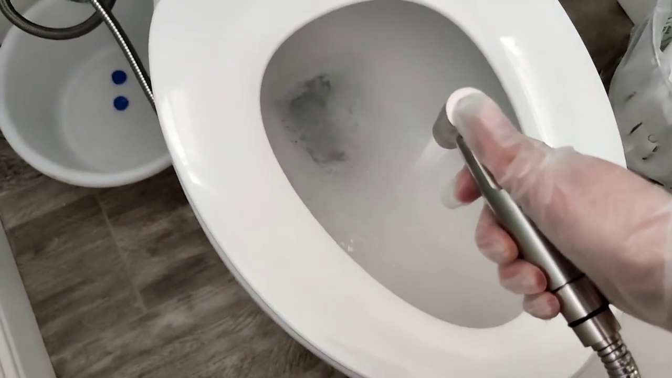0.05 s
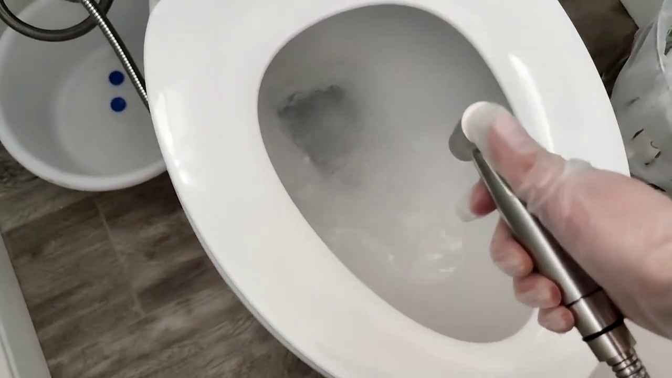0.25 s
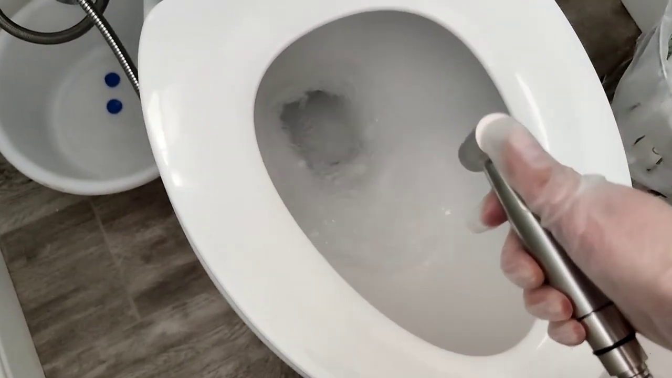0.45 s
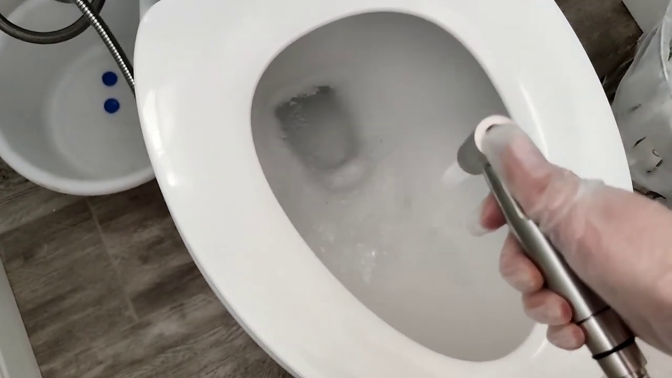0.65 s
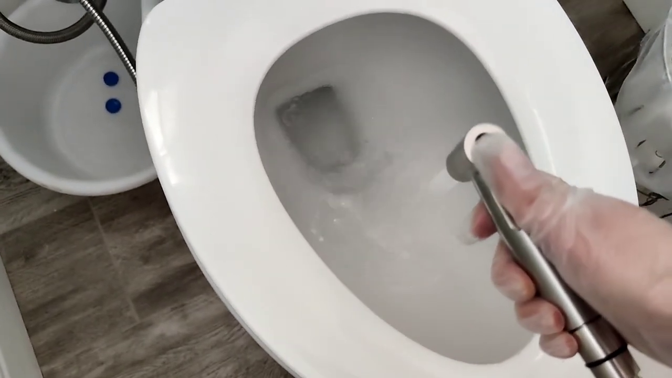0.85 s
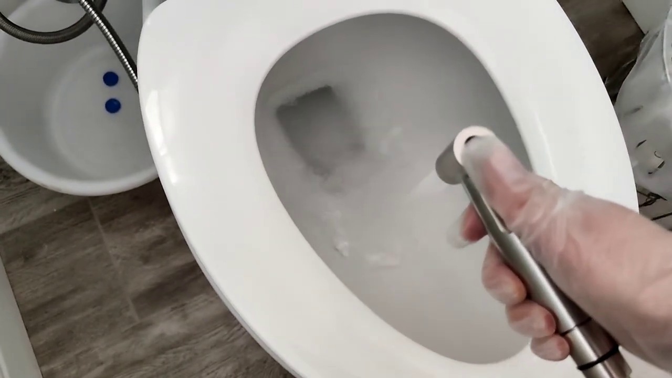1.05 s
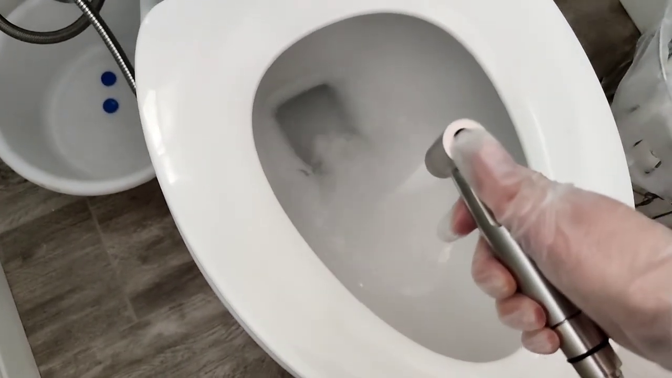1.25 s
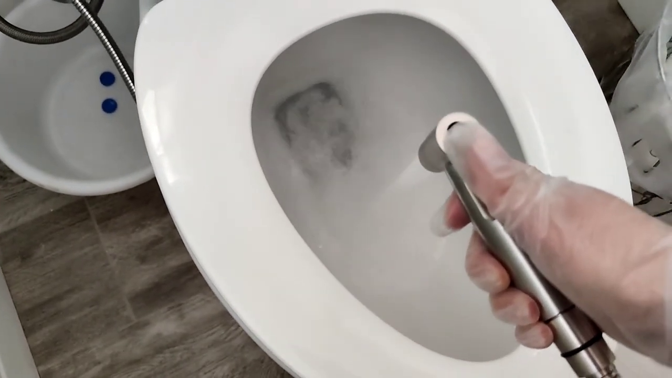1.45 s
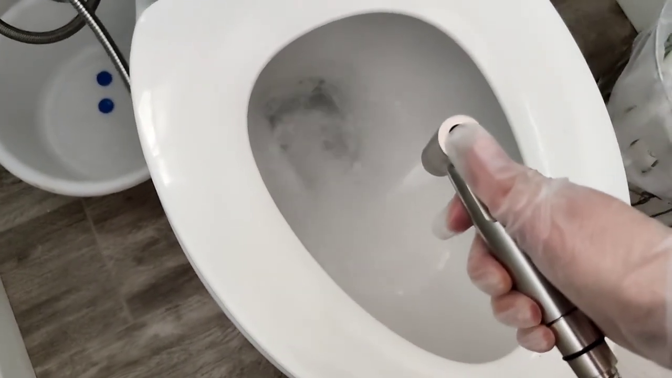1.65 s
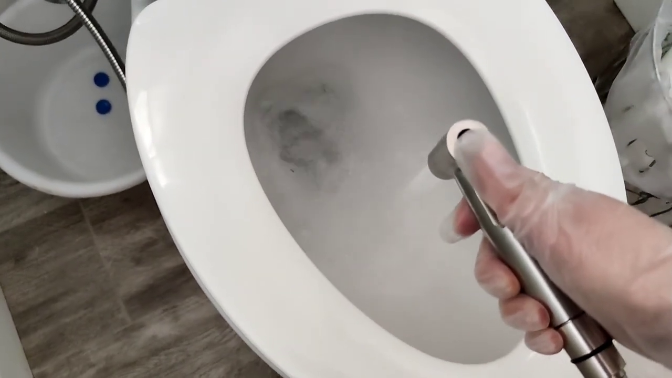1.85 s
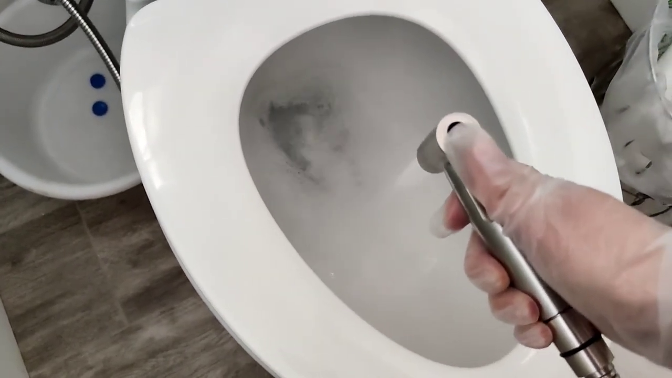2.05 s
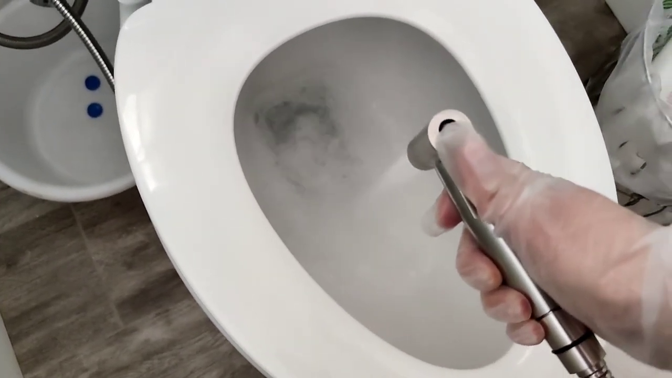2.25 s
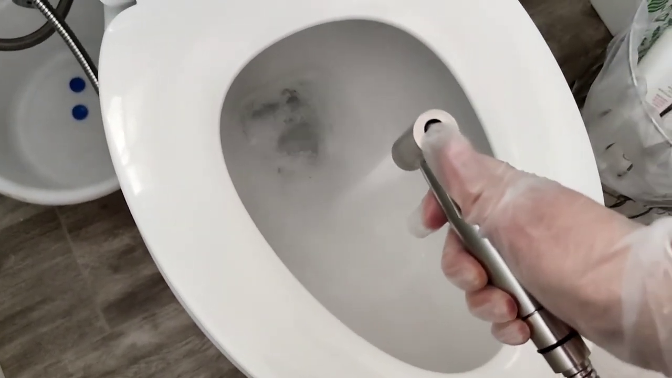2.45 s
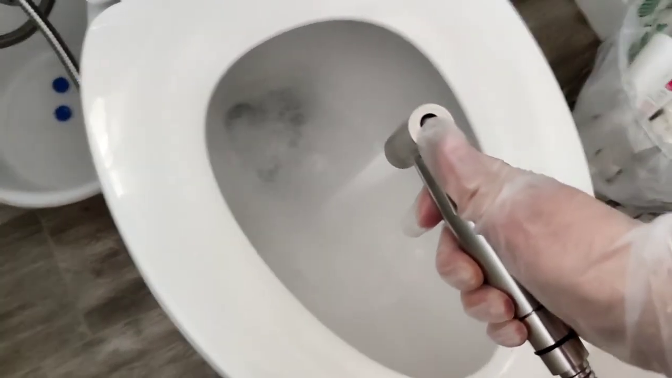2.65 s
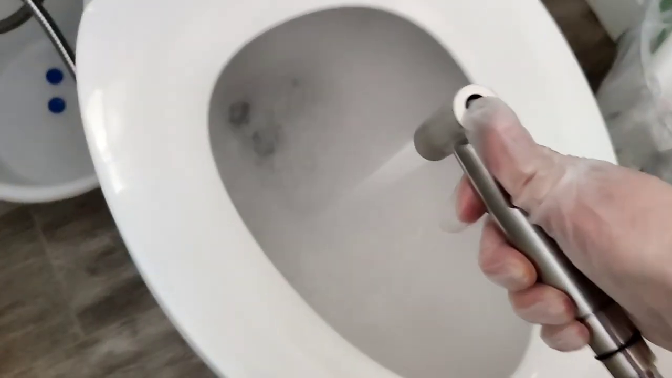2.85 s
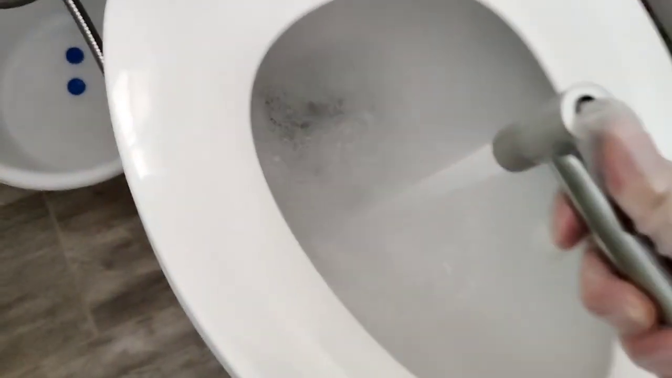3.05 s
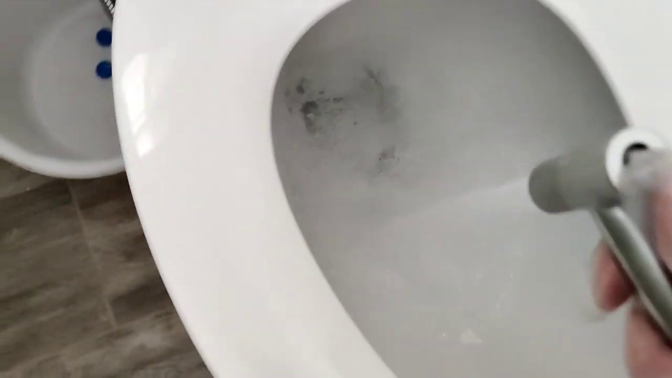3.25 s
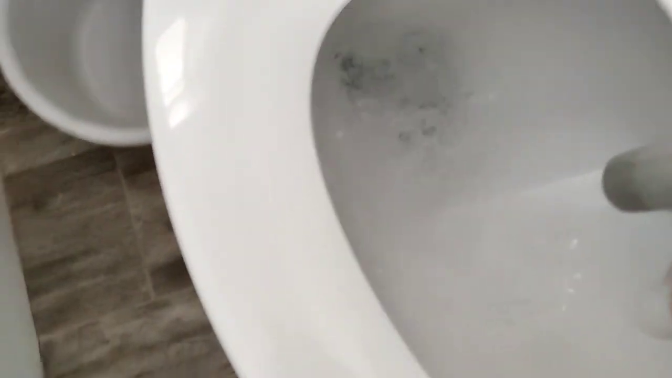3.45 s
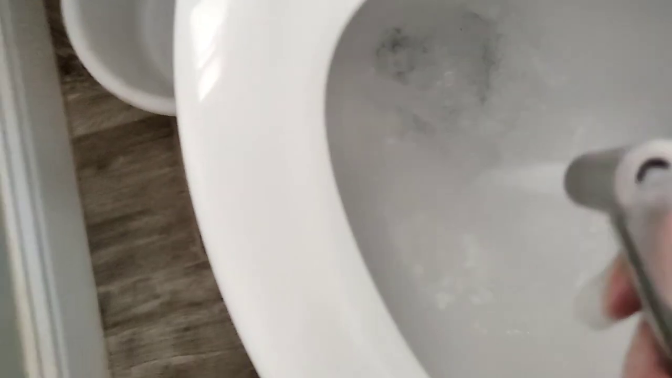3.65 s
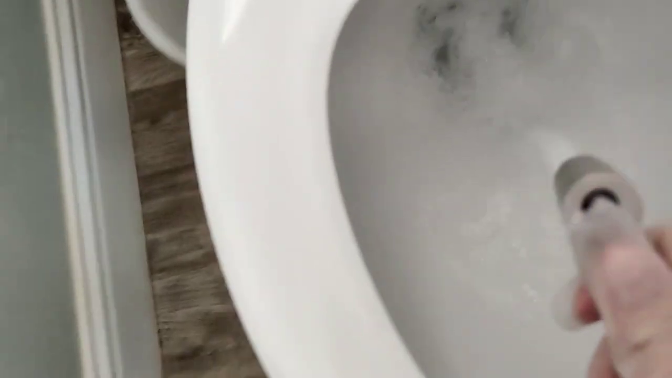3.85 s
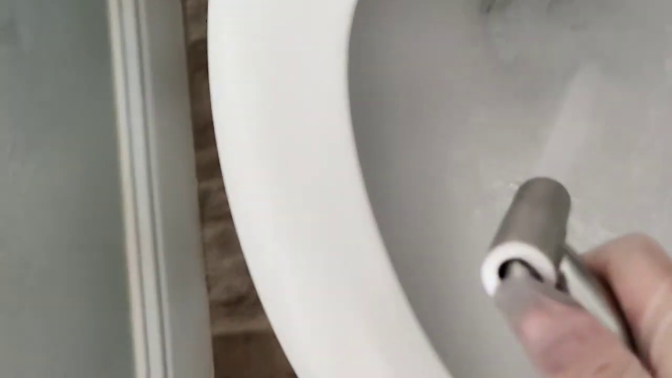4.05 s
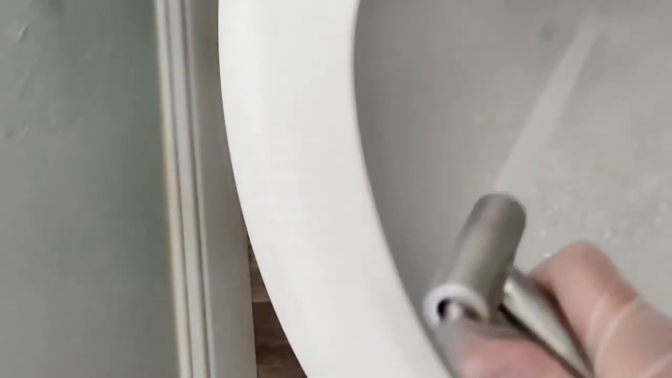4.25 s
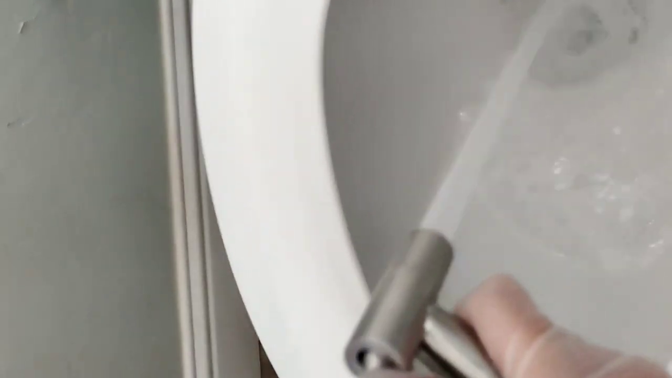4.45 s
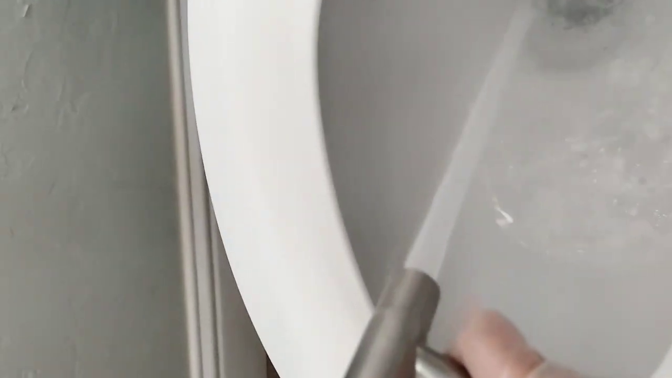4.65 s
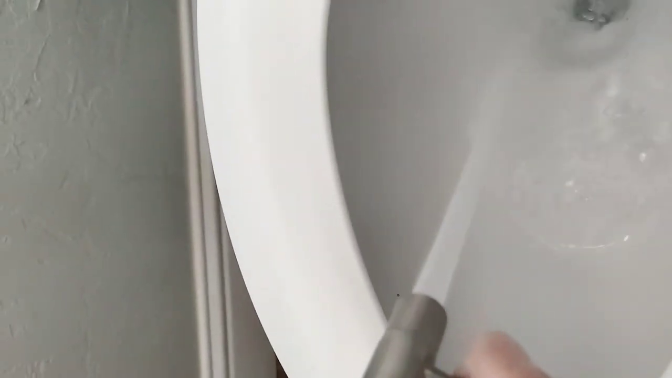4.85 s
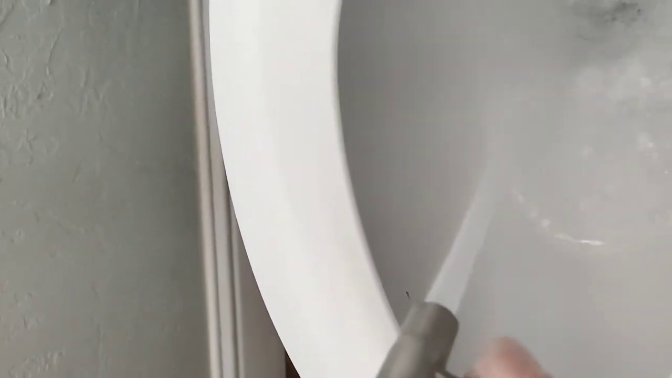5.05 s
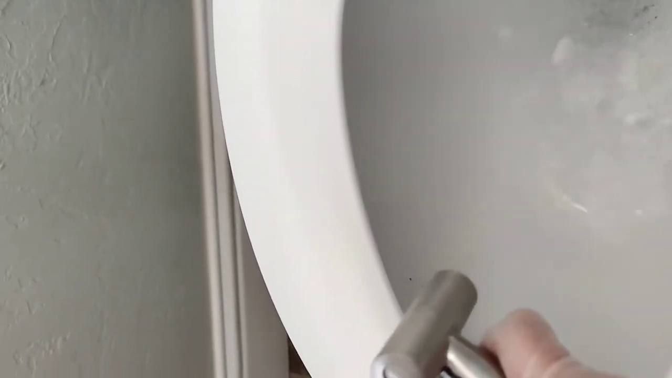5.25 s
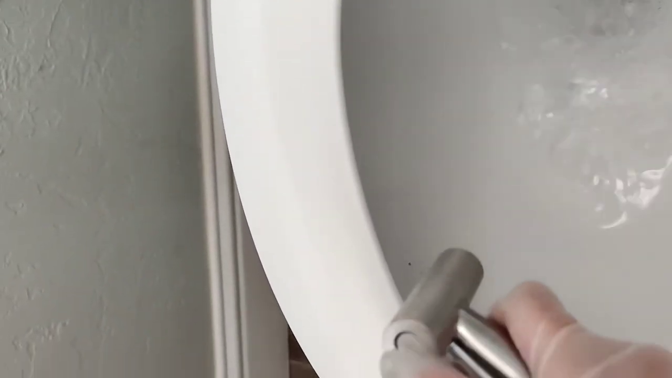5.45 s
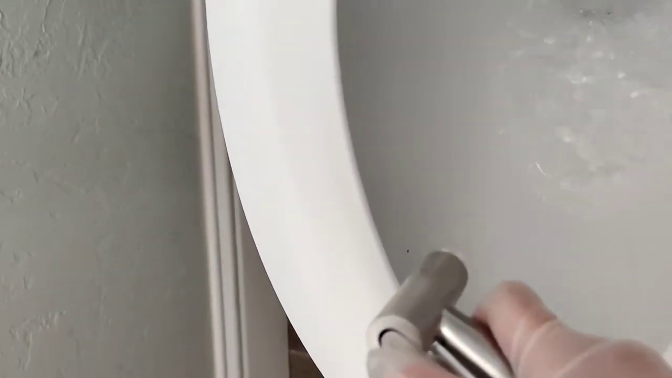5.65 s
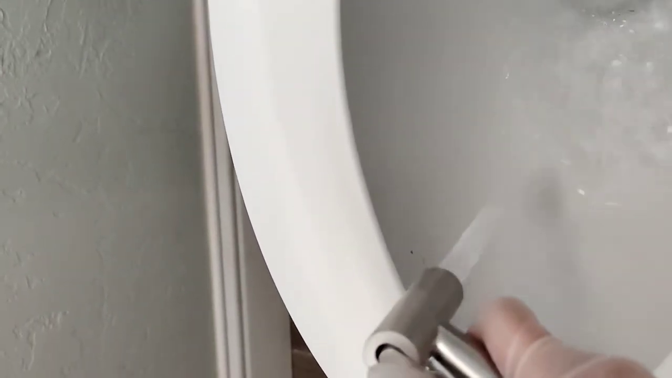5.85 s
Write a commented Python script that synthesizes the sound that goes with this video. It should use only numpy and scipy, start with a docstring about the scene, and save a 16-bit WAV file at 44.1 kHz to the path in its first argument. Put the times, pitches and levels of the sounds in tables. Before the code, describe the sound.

Close to a handheld microphone in a tiled bathroom, a pressurised water jet sprays into a toilet. A brief burst and a pause lead into a long, bright hiss with splattering drops and a low gurgle, growing more bubbly toward the end. In a second short pause there are faint drips, light hose knocks against the porcelain and slight handling rumble, before the sprayer starts once more.

```python
"""Sprayer in a toilet bowl

A handheld sprayer sends a jet of water into the bowl, stops, starts, stops and starts again.
The nozzle hisses, drops patter on porcelain, the pool gurgles and the bowl drones; in the pauses
drops tick and the hose knocks the bowl. Heard through handheld microphones in a tiled room."""
import sys
import numpy as np
from scipy import signal
from scipy.io import wavfile
from scipy.ndimage import uniform_filter1d

SR = 44100
rng = np.random.default_rng(int(sys.argv[2]) if len(sys.argv) > 2 else 0)


def to_wav(sig):
    """Store sig (one row per channel, or 1-D mono) as 16-bit WAV at the path in sys.argv[1].

    Samples outside -1..1 are clipped; the rate is SR.
    """
    pcm = np.clip(np.atleast_2d(sig), -1, 1) * 32767
    pcm = np.round(pcm).astype(np.int16)
    wavfile.write(sys.argv[1], SR, pcm.T)  # frames by channels


N = 261072
TIME = np.arange(N) / SR


def amp(db):
    return 10 ** (np.asarray(db) / 20)


def unit_rms(x):
    return x / np.sqrt(np.mean(x ** 2) + 1e-20)


def unit_centre(pair):
    return pair / np.sqrt(np.mean(pair.mean(0) ** 2))


def fader(rows, column):
    """Gain over time from one dB column."""
    rows = np.asarray(rows)
    return amp(np.interp(TIME, rows[:, 0], rows[:, column]))


def add(mix, start, sound):
    part = mix[..., round(start * SR):][..., :sound.shape[-1]]
    part += sound[..., :part.shape[-1]]


def stereo_noise(length, width):
    return rng.standard_normal(length) + width * rng.standard_normal((2, length))


def ring(x, hz, t60):
    """A two-pole resonance driven by x."""
    r, c = np.exp(-np.log(1000) / (t60 * SR)), np.cos(2 * np.pi * hz / SR)
    return (1 - r) * 2 * signal.lfilter([1, -r * c], [1, -2 * r * c, r * r], x)


def patches(spectrum, bins, frames):
    """Random swells drifting across frequency and time."""
    noise = rng.standard_normal(spectrum.shape[:0:-1]).T
    return unit_rms(uniform_filter1d(uniform_filter1d(noise, bins, axis=0), frames, axis=1))


def impacts(per_s, spread_db, fade_s, steady):
    """Loudness of landing drops: sudden rises of uneven size that fade, over a steady share."""
    sizes = amp(spread_db * np.minimum(rng.exponential(1, N), 3.2))
    hits = sizes * (rng.random(N) < per_s / SR)
    return steady + unit_rms(signal.lfilter([1], [1, -np.exp(-1 / (fade_s * SR))], hits))


def tiled_room(loudness, t60, wet_db, diffuse):
    """Noise echoing off tiles: mid is direct plus echo, side is echo plus unrelated spray."""
    direct, stray = rng.standard_normal((2, N)) * loudness
    t = TIME[:SR // 5]
    drift = np.pi * (TIME / 1.6704 + rng.random())  # the moving hand blends three echo patterns
    tails = rng.standard_normal((3, 2, len(t))) * amp(-60 * t / t60) * (t > .001)
    sends = direct * np.cos(drift + np.arange(3)[:, None] * np.pi / 3)
    mid_echo, side_echo = signal.oaconvolve(sends[:, None], tails, axes=2)[..., :N].sum(0)
    mid = unit_rms(direct) + amp(wet_db) * unit_rms(mid_echo)
    side = unit_rms(side_echo) + diffuse * unit_rms(stray)
    return np.array([unit_rms(mid), unit_rms(side)])


# Where the hands point. Each row: time in seconds, landing spot (0 near wall, 1 far across the pool),
# microphone turn (0 facing the jet, 1 aside), left over right in dB.
AIM = [(0, 0.18, .2, 0.13), (.8, 0.166, 0, -0.5), (1.2, 0, 0, .5), (2.3, 0.222, 0, 0), (2.85, 0.725, .4, 1),
       (3.2, 0.8, .4, 1), (3.42, 0.425, .4, .5), (3.8, 0.88, .5, -0.38), (4.1, 0.962, .9, -0.56),
       (4.5, 0.876, 1, -1.5), (5.3, 0.794, 1, -.5), (5.92, 0, .8, 0)]
LANDING, TURN, BALANCE = 1, 2, 3


def aimed(table, hz, t, by):
    """Crossfades a table's first and last curves as the aim moves."""
    rows, aim = np.asarray(table), np.asarray(AIM)
    blend = np.clip(np.interp(t, aim[:, 0], aim[:, by]), 0, 1)
    first, last = (np.interp(np.log(hz + 1), np.log(rows[:, 0] + 1), rows[:, k]) for k in (1, -1))
    return first[:, None] * (1 - blend) + last[:, None] * blend


# Stereo image. Each row: frequency in Hz, left-right likeness facing the jet, likeness turned aside.
LIKENESS = [(60, 0.94, 0.98), (250, 1, 1), (500, 0.503, 0.667), (1170, 0.635, 0.626), (1770, 0.124, 0.44),
            (3020, 0.36, 0.092), (4220, 0.47, -0.12), (6600, 0, 0.025), (7450, 0, -0.18),
            (7920, 0.585, 0.48), (12450, 1, 0.51), (13100, 0.42, -0.092), (16000, 0.95, 0.15)]


def at_microphones(mid_side, eq, patchy_db, size):
    """Colours mid and side with an EQ and drifting patches, then spreads them left and right."""
    framing = dict(nperseg=size, noverlap=size * 3 // 4)
    hz, t, spectrum = signal.stft(mid_side, SR, **framing)
    colour = amp(aimed(eq, hz, t, by=LANDING))
    colour /= np.linalg.norm(colour, axis=0)
    mid, side = spectrum * colour * amp(patchy_db * patches(spectrum, size // 64, 16384 // size))
    likeness = np.clip(aimed(LIKENESS, hz, t, by=TURN), -1, 1)
    side *= np.sqrt((1 - likeness) / (1 + likeness + 1e-3))
    return unit_centre(signal.istft(np.array([mid + side, mid - side]), SR, **framing)[1][:, :N])


# Trigger presses. Each row: start, opening time and release in seconds, die-away in dB per second,
# leftover dribble in dB, leftover slosh in dB.
PRESSES = [(-1, .005, .225, 160, -25, -19), (.746, .005, 5.28, 300, -29, -9), (5.895, .03, 7, 300, -29, -9)]
DRIBBLE, SLOSH = 0, 1


def valve(start_db, build_s, hang_s, runoff, runoff_db_per_s, seep_db):
    """Gain of one layer: seeps, opens with a spit, builds, holds, dies away and runs off."""
    gain = np.zeros(N)
    for opens, opening_s, release, dies_db_per_s, *leftover_db in PRESSES:
        since, after = np.maximum(TIME - opens, 0), np.maximum(TIME - release - hang_s, 0)
        opening_db = -60 * np.clip(1 - since / opening_s, 0, 1)
        build_db = start_db * np.clip(1 - since / build_s, 0, 1)
        spit_db = 6.5 * np.exp(-since / .0102)  # trapped air lifts the first moment
        fall_db = np.maximum(-dies_db_per_s * after, leftover_db[runoff] - runoff_db_per_s * after)
        gain += (TIME > opens) * amp(opening_db + build_db + spit_db + fall_db)
        gain += (TIME < opens + opening_s) * amp(seep_db - 135 * np.maximum(opens - TIME, 0))
    return gain


# The jet's faders at full flow. Each row: time in seconds, hiss in dB, patter in dB.
JET_LEVELS = [(0, -21.5, -28.5), (.22, -29.5, -33.5), (.8, -22.5, -32), (1.34, -22.5, -25),
              (1.71, -23, -27.5), (1.82, -29, -34.5), (1.96, -23.5, -28.5), (2.25, -23, -28),
              (2.71, -22.5, -28), (2.89, -24, -30.5), (3.25, -23.5, -29.5), (3.42, -22, -27),
              (3.62, -24, -28.5), (3.75, -23, -28), (3.86, -26.5, -29), (4.01, -25.5, -26.5),
              (4.09, -29, -26.5), (4.19, -29, -32), (4.5, -30, -35), (4.56, -27.5, -35.5),
              (4.77, -29.5, -35), (4.91, -23.5, -31.5), (5.15, -24, -34.5), (5.28, -26.5, -34),
              (5.87, -26.5, -34), (5.89, -25, -46)]
# Hiss colour. Each row: frequency in Hz, gain in dB aimed at the near wall, gain in dB aimed far.
HISS_EQ = [(2850, -31.5, -21), (5500, -17.5, -8.5), (6948, -5.5, 0.5), (8710, -5, -7), (9760, 3, -2.5),
           (11760, -2.5, -8.5), (13630, 2, -2.5), (15050, 0.5, -7), (16800, -8, -3)]


def hiss(bursts):
    """The nozzle's fine spray: dense, tiny impacts blur into bright noise."""
    grain = impacts(per_s=900, spread_db=4, fade_s=.0009, steady=3.2)
    spray = tiled_room(grain * bursts, t60=.1, wet_db=-9, diffuse=2)
    flow = valve(start_db=-5, build_s=.42, hang_s=0, runoff=DRIBBLE, runoff_db_per_s=27, seep_db=-33)
    return fader(JET_LEVELS, 1) * flow * at_microphones(spray, HISS_EQ, patchy_db=.39, size=512)


# Patter colour. Each row: frequency in Hz, gain in dB aimed at the near wall, gain in dB aimed far.
PATTER_EQ = [(700, -49, -21), (1610, -6.5, -8), (1970, -8, 3), (2326, 0, -0.5), (2830, -3.5, 1),
             (3003, 0.5, -3), (4200, 2, -4.5), (5140, -2, -6.5), (5540, -2.5, -2.5), (6940, 2, -11.5),
             (8960, -5.5, -7), (12100, -32.5, -7)]
# Air modes between the bowl's walls. Each row: pitch in Hz, relative level in dB, t60 in seconds.
AIR_MODES = [(1706, 6.5, 0.0375), (2396, -12, 0.04), (2545, -1, 0.027), (3180, -15, 0.59),
             (3344, -3, 0.024), (3932, -3, 0.0285), (4135, -2.5, 0.067), (4570, -4, 0.049)]


def patter(bursts):
    """Drops strike the porcelain and ring the air in the bowl."""
    grain = impacts(per_s=600, spread_db=5.96, fade_s=.00237, steady=3.05)
    drops = tiled_room(grain * bursts, t60=.162, wet_db=-3.38, diffuse=1)
    drops = at_microphones(drops, PATTER_EQ, patchy_db=1.265, size=512)
    hollow = sum(amp(db) * ring(drops, hz, t60) for hz, db, t60 in AIR_MODES)
    flow = valve(start_db=-8, build_s=.23, hang_s=0, runoff=DRIBBLE, runoff_db_per_s=22, seep_db=-53)
    return fader(JET_LEVELS, 2) * flow * unit_centre(drops + .506 * hollow)


# The pool's faders. Each row: time in seconds, gurgle in dB, lower and upper drone mode in dB.
POOL_LEVELS = [(0, -37, -40.5, -39), (.25, -48.5, -45.5, -53.5), (.85, -44.5, -44, -41),
               (1.43, -39, -37, -42), (1.72, -38, -37, -41), (1.76, -41.5, -47, -44.5),
               (2.1, -43, -41.5, -45.5), (2.42, -39, -33.5, -39.5), (2.6, -38.5, -38, -37),
               (2.77, -38, -30, -30.5), (2.95, -40, -36.5, -37.5), (3.12, -44, -34.5, -44),
               (3.5, -39.5, -40.5, -40), (3.72, -35, -33, -36), (4.07, -35, -49, -37),
               (4.22, -34.5, -49.5, -52), (4.38, -34, -40, -33), (4.75, -37, -44, -43.5),
               (4.9, -36.5, -43.5, -38), (5.18, -35.5, -43.5, -45), (5.3, -40.5, -48, -34.5)]
# Gurgle colour. Each row: frequency in Hz, gain in dB aimed at the near wall, gain in dB aimed far.
GURGLE_EQ = [(249, -46.5, -15), (393.2, -7.5, -8.5), (644, -8, -3), (861, -7, -11.5), (1052, -5, -0.5),
             (1500, -9.5, -7), (2235, -7, -14.5), (3520, -25, -14.5)]
# Modes of the porcelain. Each row: pitch in Hz, relative level in dB when churned,
# relative level in dB when knocked, t60 in seconds when knocked.
BOWL_MODES = [(205, 1, -19.5, 0.5), (260, 0, -12, 0.085), (384.8, 3.5, -4, 0.465), (604.1, -1, -19, 0.268),
              (962.5, 2.5, -13, 0.221), (1036, -8.5, -9, 0.115), (1314.8, -10, -2, 0.19),
              (1490, -27, -21, 0.21), (2140, -47, -21, 0.14)]


def gurgle():
    """The jet churns the pool, which rings all but the bowl's two lowest modes."""
    grain = impacts(per_s=120, spread_db=2.9, fade_s=.005, steady=5)
    churn = tiled_room(grain, t60=.283, wet_db=-6, diffuse=.56)
    churn = at_microphones(churn, GURGLE_EQ, patchy_db=1.797, size=1024)
    porcelain = sum(amp(db) * ring(churn, hz, .546 * t60) for hz, db, _, t60 in BOWL_MODES[2:])
    flow = valve(start_db=-45, build_s=.0012, hang_s=.0689,
                 runoff=SLOSH, runoff_db_per_s=36, seep_db=-57.5)
    return fader(POOL_LEVELS, 1) * flow * unit_centre(churn + 2.65 * porcelain)


# Bands that fill and hollow as the nozzle turns. Each row: time in seconds, centre of the moving band
# in Hz, its gain in dB, gain of the 6500 Hz band in dB.
NOZZLE_BANDS = [(0, 5000, 1, 0), (2.0, 5400, -1, -0.5), (2.4, 4300, 0.5, 2), (2.68, 5300, 3.5, 2.5),
                (2.85, 5000, -4, 2.5), (3.2, 4700, -3.5, 2), (3.4, 5300, 3, 7), (3.57, 4400, 1, -2),
                (3.72, 5400, -3, -1), (3.95, 4700, -4, -2), (4.1, 5300, 1, -3), (4.8, 5000, 1, 0),
                (5.0, 5400, 1, -1.5), (5.25, 4000, -2.5, -0.5)]


def jet():
    """Hiss, patter and gurgle together, swishing as the nozzle turns."""
    bursts = impacts(per_s=63, spread_db=9.1, fade_s=.0226, steady=7.05)
    water = hiss(bursts) + patter(bursts) + gurgle()
    hz, t, spectrum = signal.stft(water, SR, nperseg=512, noverlap=384)
    rows, hz = np.asarray(NOZZLE_BANDS), hz[:, None]
    centre_hz, moving_db, upper_db = (np.interp(t, rows[:, 0], column) for column in rows.T[1:])
    bands_db = moving_db * np.exp(-((hz - centre_hz) / 800) ** 2)
    bands_db += upper_db * np.exp(-((hz - 6500) / 500) ** 2)
    swish_db = patches(spectrum, bins=8, frames=70)
    # Each press starts thin; the low cut slides down as the jet digs into the pool.
    cut_hz = sum((t > opens) * 1500 * np.exp(-abs(t - opens) / .11) for opens, *_ in PRESSES)
    cut_db = 15 * np.minimum(np.log2((hz + 1) / (cut_hz + 1)), 0)
    spectrum *= amp(bands_db + swish_db + cut_db)
    return signal.istft(spectrum, SR, nperseg=512, noverlap=384)[1][:, :N]


def drone():
    """Noise from the pool rings the bowl's two lowest modes, each over a broad slosh."""
    out = np.zeros((2, N))
    flow = valve(start_db=-33.5, build_s=.3857, hang_s=.0041,
                 runoff=SLOSH, runoff_db_per_s=56, seep_db=-59.5)
    for mode, (slosh_hz, slosh_t60) in enumerate([(222, .06), (310, .018)]):
        hz, _, _, t60 = BOWL_MODES[mode]
        push = stereo_noise(N, width=.132)
        hum = ring(ring(push, hz, .5 * t60), hz, .0328)
        hum /= np.sqrt(uniform_filter1d(hum ** 2, size=9000) + 1e-12)  # throbs, but keeps its strength
        slosh = ring(ring(push, slosh_hz, slosh_t60), slosh_hz, slosh_t60)
        out += fader(POOL_LEVELS, mode + 2) * flow * unit_rms(unit_rms(hum) + .3 * unit_rms(slosh))
    return signal.sosfilt(signal.butter(4, 170, "highpass", fs=SR, output="sos"), out)


# The grip's fader. Each row: time in seconds, level in dB.
GRIP_LEVELS = [(0, -59.5), (.6, -78), (1, -66), (1.7, -62.5), (1.85, -71), (2.3, -63), (3.8, -59.5),
               (4.3, -53), (4.5, -46.5), (5.3, -47.5), (5.65, -60), (5.92, -70)]
# The hand shifts. Each row: middle in seconds, level in dB, half length in seconds.
GRIP_SHIFTS = [(2.45, -53, 0.083), (3.955, -49.5, 0.058), (4.716, -46.5, 0.043), (5.499, -47, 0.0334),
               (5.759, -52.5, 0.0295)]
# Rumble colour. Each row: frequency in Hz, gain in dB.
RUMBLE_EQ = [(12, -42.5), (20, -19.5), (75, 9), (89, 6.5), (119, -15.5), (150, -2), (170, -13),
             (220, -37.5), (370, -120)]


def handling():
    """The hand on the microphones makes a low rumble that swells when it shifts."""
    swells = sum(amp(db) * np.exp(-((TIME - middle) / half) ** 2) for middle, db, half in GRIP_SHIFTS)
    rumble = at_microphones(rng.standard_normal((2, N)), RUMBLE_EQ, patchy_db=3.57, size=2048)
    return (fader(GRIP_LEVELS, 1) + swells) * rumble


# Colour of the background. Each row: frequency in Hz, gain in dB.
ROOM_EQ = [(18, -36), (30, 1.5), (283, -27), (1340, -18), (1490, -12.5), (3380, -8), (3660, -11),
           (7470, -8.5), (8310, -19), (9730, -15), (14500, -12.5), (16500, -7)]


def room_tone():
    """A faint bed of trickle and room noise."""
    return amp(-56.5) * at_microphones(rng.standard_normal((2, N)), ROOM_EQ, patchy_db=2.1, size=1024)


# Stray drops. Each row: start in seconds, relative level in dB, pitch in Hz, t60 in seconds.
TICKS = [(0.3966, -40.5, 10500, 0.032), (0.6, -44, 9800, 0.029), (0.715, -43.5, 10200, .02),
         (0.7244, -43, 13300, .05), (5.665, -35, 6690, 0.0164), (5.7189, -43.5, 15600, .03),
         (5.8498, -46, 5474, 0.034)]


def ticks():
    """Drops tick on wet porcelain: narrow bursts of noise with a faint echo off the tiles."""
    out, t = np.zeros((2, N)), TIME[:4000]
    for start, db, hz, t60 in TICKS:
        grain = unit_rms(ring(stereo_noise(len(t), width=.5), hz, .0095))
        attack = 1 - np.exp(-t / .001)
        decay = amp(-60 * t / t60) + .32 * amp(-60 * t / .22)
        add(out, start, amp(db - 5.5) * grain * attack * decay)
    return out


# Bubbles in the pool. Each row: start in seconds, level in dB, pitch in Hz, t60 in seconds.
BUBBLES = [(.466, -54, 2920, 0.12), (.84, -22, 1656, 0.045), (.85, -34.5, 1188, 0.2),
           (.852, -35, 951, 0.15), (.843, -31.5, 713, 0.043), (.852, -38.5, 611.2, 0.137),
           (.922, -36.5, 913, 0.091), (.965, -36.5, 362, 0.12), (1.015, -31, 355, 0.064),
           (1.026, -35, 970.6, 0.116), (4.2, -26.5, 1029, 0.125), (4.362, -19, 1015, 0.048),
           (4.388, -31, 1980, 0.07), (4.506, -24, 1072, 0.075), (4.779, -24.5, 1283, 0.052),
           (4.812, -26, 2253, 0.09), (4.881, -26.5, 2566, 0.057), (4.996, -21.5, 596, 0.0373),
           (5.048, -21, 1106, 0.036), (5.15, -29, 950, 0.14), (5.317, -26.5, 951, 0.059)]


def bubbles():
    """Each bubble bursts as a splash of noise ringing around its pitch, with a tone inside."""
    out, t = np.zeros((2, N)), TIME[:SR // 8]
    for start, db, hz, t60 in BUBBLES:
        splash = unit_rms(ring(stereo_noise(len(t), width=.4), hz, .015))
        envelope = amp(db - 60 * t / t60) * (1 - np.exp(-t / .003))
        add(out, start, envelope * (.75 * np.sin(2 * np.pi * hz * t) + .5 * splash))
    return out


# Spits of air. Each row: start in seconds, level in dB.
AIR_SPITS = [(.754, -14), (.7572, -8.5), (.76, -11), (5.913, -29)]


def trigger():
    """Air spits from the nozzle as the valve opens; once, the trigger jolts the hand."""
    out, t = np.zeros(N), TIME[:SR // 4]
    spit = np.exp(-((t - .0003) / .000164) ** 2) * np.sin(2 * np.pi * 9800 * t)
    for start, db in AIR_SPITS:
        add(out, start, amp(db) * spit)
    jolt = amp(-44 - 60 * t / .15) * (1 - np.exp(-t / .008)) * np.sin(2 * np.pi * 100 * t)
    add(out, .752, jolt)
    return out


# Glugs. Each row: middle in seconds, peak level in dB, pitch in Hz, half length in seconds.
GLUGS = [(4.297, -30.5, 260.6, 0.0404), (4.403, -27.5, 258, 0.0836), (4.402, -32.5, 201.4, .03),
         (4.579, -31, 265, 0.0485), (4.727, -28.5, 263.6, 0.0234), (4.903, -30.5, 259.4, 0.0365),
         (4.901, -35, 203, 0.017), (5.018, -36.5, 269.2, 0.031), (5.068, -32, 199.2, 0.027),
         (5.294, -31, 198, 0.0236)]


def glugs():
    """Air glugs in the pool and sounds a low mode of the bowl: a tone that swells and fades."""
    out = np.zeros(N)
    for middle, db, hz, half in GLUGS:
        swell = amp(db) * np.exp(-((TIME - middle) / half) ** 2)
        out += swell * np.sin(2 * np.pi * (hz * TIME + rng.random()))
    return out


# Hose hits. Each row: start in seconds, level in dB, hardness in dB per octave about 400 Hz,
# contact time in seconds.
HOSE_KNOCKS = [(5.448, -43.5, -13.5, .006), (5.476, -40, -20, 0.00625), (5.491, -47, 0.5, 0.0057),
               (5.5, -46, -30.5, 0.03), (5.545, -54, 2.5, 0.008), (5.699, -45.5, -10.5, 0.017),
               (5.728, -38, -7, 0.02), (5.757, -48, 3, 0.006), (5.766, -42.5, 3, 0.008)]


def hose_knocks():
    """The hose rattles against the bowl and rings every mode; hard hits favour the high ones."""
    out, t = np.zeros((2, N)), TIME[:SR // 3]
    for start, db, hardness, contact_s in HOSE_KNOCKS:
        contact = np.exp(-t / contact_s) * (1 - np.exp(-t / .0027))
        rattle = contact * stereo_noise(len(t), width=.31)
        for hz, _, mode_db, t60 in BOWL_MODES:
            mode = ring(ring(rattle, hz, .0146), hz, t60)
            peak = amp(db + mode_db + hardness * np.log2(hz / 400))
            add(out, start, peak * mode / abs(mode).max())
    return out


def scene():
    """The full mix; jet and room tone lean left or right with the aim."""
    rumble, room = handling(), room_tone()
    lean = np.sqrt(fader(AIM, BALANCE))
    spray = (jet() + room) * np.array([lean, 1 / lean])
    pool = drone() + glugs() + bubbles()
    return spray + pool + hose_knocks() + ticks() + trigger() + rumble


def record(dry):
    """A steep low-pass takes off the very top, above 15900 Hz."""
    lowpass = signal.firwin(511, 15900, window=("kaiser", 9), fs=SR)
    return signal.oaconvolve(dry, lowpass[None], "same")


dry = scene()
out = record(dry)
to_wav(out)
```